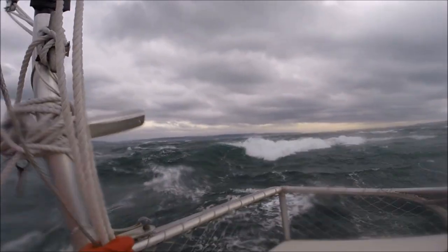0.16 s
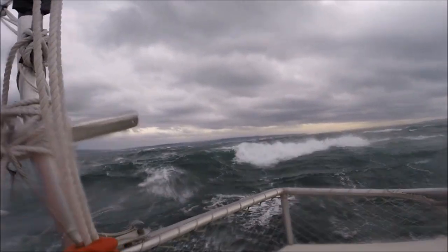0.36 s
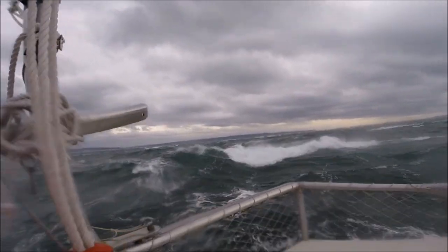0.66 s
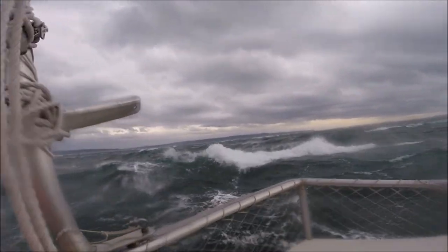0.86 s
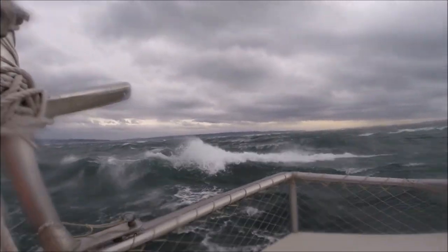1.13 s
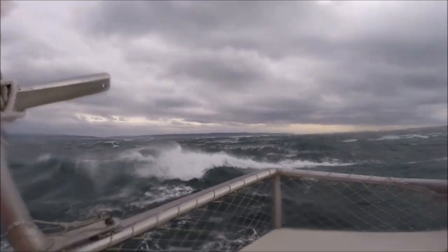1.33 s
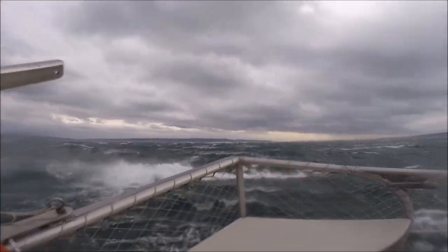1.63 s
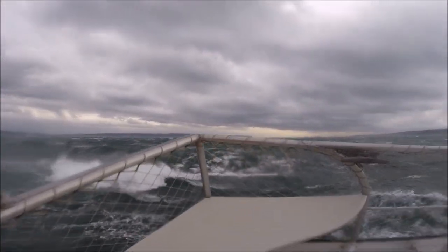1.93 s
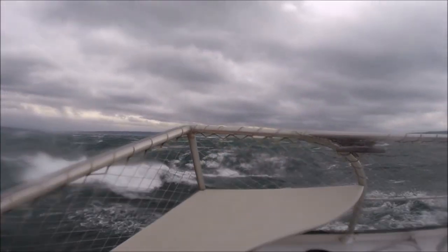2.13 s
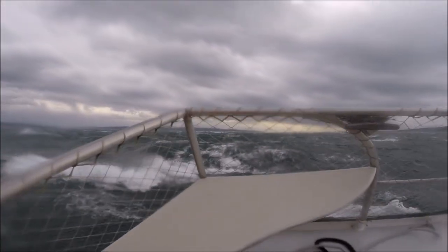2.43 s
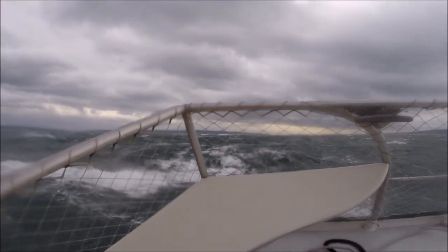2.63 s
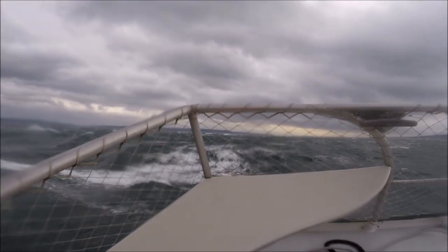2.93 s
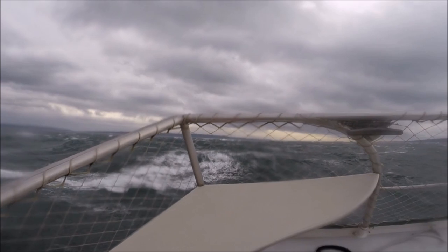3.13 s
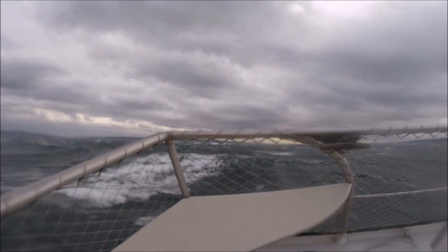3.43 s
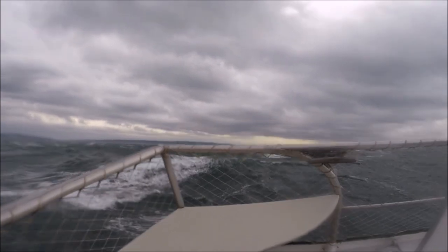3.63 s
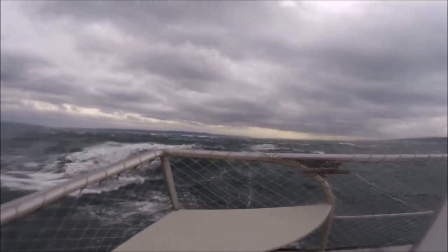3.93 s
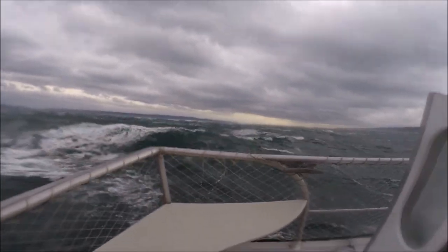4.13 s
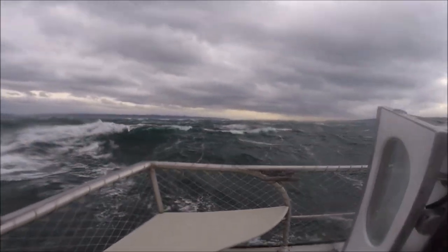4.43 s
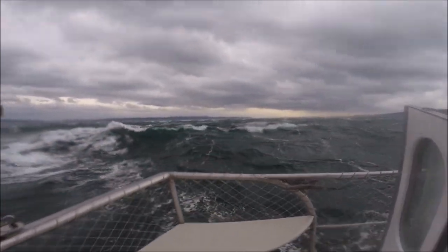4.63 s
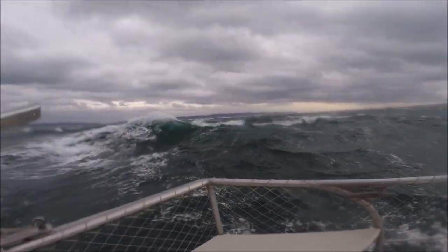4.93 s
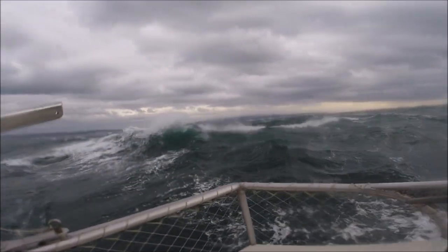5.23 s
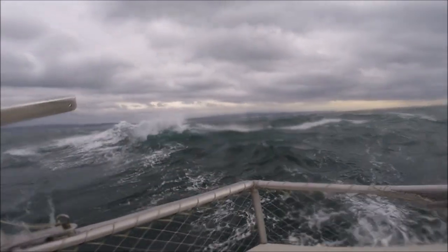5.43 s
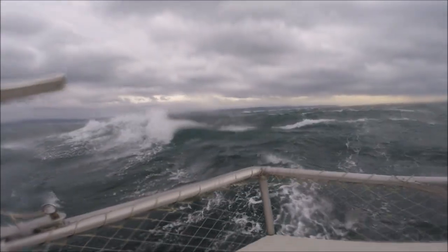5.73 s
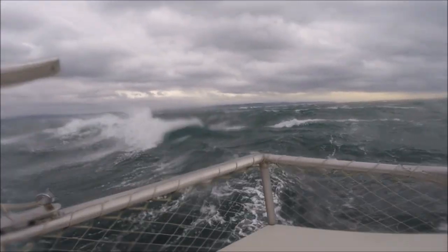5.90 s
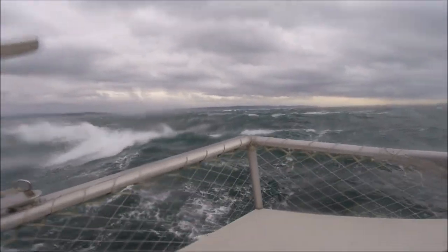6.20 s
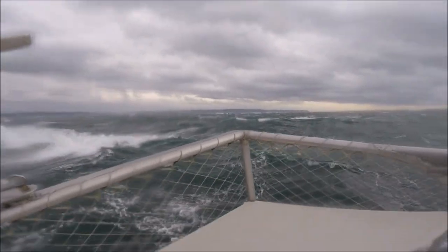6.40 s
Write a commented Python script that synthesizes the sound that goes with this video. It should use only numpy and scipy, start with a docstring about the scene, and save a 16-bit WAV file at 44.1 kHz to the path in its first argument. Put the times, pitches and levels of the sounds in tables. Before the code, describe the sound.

On an open sailboat deck in rough sea, gale wind blasts a small camera's microphone at close range. A high, hissing, whistling rush flutters in rapid buffets over low thuds, with sharp ticks of spray. It is hardest around one to two seconds, falls away past three and a half to reveal the sea's steady wash, then returns in broken puffs and strong gusts.

```python
"""A high, tearing rush of wind comes first: a gale blows over a small camera on a sailboat's deck.
Turbulent air rings the cavities of the housing (rush, howl) and pushes on the microphone (rumble).
Most buffets come and go within hundredths of a second, and spray ticks on the case.
Behind the wind the sea washes steadily, heard best in the lulls, with a faint electronic whine."""
import sys
import numpy as np
from scipy import signal
from scipy.fft import rfft, irfft
from scipy.io import wavfile
from scipy.ndimage import uniform_filter1d, map_coordinates

SR = 44100
rng = np.random.default_rng(int(sys.argv[2]) if len(sys.argv) > 2 else 0)


def unload_audio(sound):
    """Save the sound as a 16-bit wav file, at the path given as the first command line argument."""
    columns = np.transpose(np.atleast_2d(sound))
    # keep every value between -1 and 1, then stretch to whole-number steps
    steps = np.round(np.clip(columns, -1, 1) * 32767)
    wavfile.write(sys.argv[1], SR, steps.astype(np.int16))


N = 289296
T = np.arange(N) / SR  # time in s
GALE_DB = -20.5  # reference wind level of a full gale, dB

# steady blow between buffets: t/s, level/dB
WIND = [(0.0, -28.5), (0.36, -25.5), (0.66, -25.5), (1.0, -20), (1.92, -17.5), (2.52, -27.5), (3.1, -27.5),
        (3.43, -45.5), (3.69, -52), (3.78, -44), (4.18, -45), (4.33, -33.5), (4.86, -31.5), (5.11, -43),
        (5.33, -39.5), (5.57, -28), (6.27, -24.5), (6.56, -28.5)]
# sudden buffets on top of the blow: t/s, length/s, level/dB
BUFFETS = [(0.121, .012, -20), (.154, 0.043, -21.5), (0.234, .03, -22), (0.335, 0.033, -26),
           (0.437, 0.025, -23), (0.544, 0.034, -22), (0.647, 0.033, -18.5), (0.683, 0.022, -16),
           (0.832, .048, -17.5), (0.928, 0.025, -21.5), (1.194, 0.048, -22), (1.354, .18, -25),
           (1.621, .05, -18.5), (2.031, 0.013, -19), (2.227, 0.056, -25.5), (2.506, 0.014, -23.5),
           (2.54, 0.061, -26), (2.67, 0.0063, -23), (2.714, 0.029, -25.5), (2.781, 0.041, -25.5),
           (2.982, 0.018, -24), (3.051, 0.0078, -23.5), (3.088, 0.024, -27), (3.155, 0.096, -24),
           (3.321, 0.012, -26.5), (3.423, .0075, -33.5), (3.632, 0.041, -36.5), (3.706, 0.0084, -28),
           (3.729, 0.036, -30), (3.799, .013, -36), (3.846, 0.019, -25.5), (3.888, 0.097, -37),
           (4.123, 0.025, -27), (4.173, .055, -35), (4.262, 0.016, -30), (4.313, 0.032, -28.5),
           (4.378, .05, -23.5), (4.439, 0.082, -23.5), (4.602, 0.026, -28.5), (4.663, .01, -29),
           (4.713, 0.12, -27), (4.89, 0.053, -25.5), (5.025, 0.024, -30.5), (5.303, 0.0055, -29),
           (5.333, 0.0061, -32), (5.368, .1, -26.5), (5.38, 0.049, -20.5), (5.719, .052, -26),
           (5.791, .02, -20.5), (5.846, 0.054, -24), (5.97, 0.039, -28), (6.134, 0.037, -28),
           (6.237, 0.035, -22), (6.325, 0.054, -26), (6.374, 0.056, -20.5)]
# brief lulls in which the flow leaves the housing: middle t/s, half length/s, depth/dB
LULLS = [(0.114, 0.034, 9.5), (0.428, 0.012, 5.5), (.635, .015, 3), (0.822, 0.013, 5), (1.29, .05, 2),
         (2.297, 0.053, 2.5), (2.49, 0.018, 12), (2.685, 0.032, 19), (2.965, 0.018, 5.5), (3.063, .02, 7.5),
         (3.79, .03, 2), (4.065, 0.034, 11), (4.3, 0.025, 18), (4.624, 0.061, 11.5), (4.702, .012, 2.5),
         (5.018, 0.0085, 9), (5.253, 0.065, 5), (5.67, 0.025, 3.5), (6.042, 0.018, 7)]


def wind_level(rise_s=0.0032, fall_s=0.0065, linger=0.11):
    """Power addition: the steady blow sinks in the lulls, and the power of the buffets adds to it (dB)."""
    blow_db = curves(WIND)[0]
    for middle, half_length, depth_db in LULLS:
        blow_db = blow_db - depth_db * swell(middle, half_length)
    buffet_power = 0
    for start, length, db in BUFFETS:
        # a longer buffet dies more slowly: a share of its length is added to the fall
        envelope = burst(start, length, rise_s, fall_s + linger * length)
        buffet_power = buffet_power + (undb(db) * envelope) ** 2
    return 10 * np.log10(undb(blow_db) ** 2 + buffet_power)


def turbulence(wind_db, slack=0.071):
    """Intermittency: a full gale is evenly turbulent, a slack flow comes in separate puffs (swings in dB)."""
    patchy = np.clip(0.5 + slack * (GALE_DB - wind_db), 0.7, 1.5)
    return patchy * (0.63 * walk(45) + 1.32 * walk(170) + 1.56 * walk(600))


# air resonances of the housing: f/Hz, width/Hz, relative level/dB
CAVITIES = [(1684, 460, -9), (2226, 640, -6.5), (2400, 210, -2.5), (2740, 646, -3), (3474, 610, -14),
            (4240, 600, -17.5), (5624, 700, -17), (6070, 503, -13), (7150, 690, -31.5)]
# gain of the upper cavity ringing: t/s, level/dB
BRIGHTNESS = [(0, -1), (.9, -0.5), (1.7, -3), (2.3, -0.5), (3.2, -3), (5.0, -2.5), (5.4, 3.5), (5.8, -1.5),
              (6.15, 7), (6.56, -3.5)]
# spectrum of the sizzle on the edges: f/Hz, relative level/dB
SIZZLE = [(5000, -3), (7500, 9), (8300, -3), (9500, 0), (10600, -1.5), (12000, -15), (13300, -19.5),
          (15500, -40)]


def rush(wind_db, swirl_db, trim_db=-1, sizzle_db=-28, sizzle_growth=1.0):
    """Flow-excited resonance: small eddies ring the cavities of the housing and sizzle on its edges."""
    ringing = resonate(noise(swirl_db + 0.2 * walk(200)), CAVITIES)
    # the upper resonances come and go as the angle of the flow changes
    bright_db = curves(BRIGHTNESS)[0] + 1.0 * walk(30) + 2.0 * walk(250)
    highpass = signal.butter(2, 3600, "high", fs=SR, output="sos")
    upper = signal.sosfiltfilt(highpass, ringing)
    ringing = ringing + (undb(bright_db) - 1) * upper
    sizzle = colour(noise(swirl_db + 2.0 * walk(22) + 2.0 * walk(1100)), SIZZLE)
    sizzle_level_db = GALE_DB + sizzle_db + sizzle_growth * (wind_db - GALE_DB)
    return ringing * undb(wind_db + trim_db) + sizzle * undb(sizzle_level_db)


# the main cavity, which sings out in the hardest wind: f/Hz, width/Hz, relative level/dB
HOWL = [(2593, 280, 0)]


def howl(wind_db, swirl_db, level_db=-27, growth=1.08):
    """Sustained excitation: a long hard blow feeds the main cavity, so its pitch stands out of the rush."""
    sustained_db = uniform_filter1d(wind_db, SR // 8)  # wind averaged over 1/8 s
    drive_db = wind_db - GALE_DB + (growth - 1) * (sustained_db - GALE_DB)
    return resonate(noise(swirl_db + 1.0 * walk(25)), HOWL) * undb(level_db + drive_db)


# large eddies that hit the microphone port squarely:
# middle t/s, half length/s, rumble gain/dB, flutter gain/dB
EDDIES = [(0.172, .035, 8, 1), (.71, 0.038, 2.5, 6.5), (0.868, 0.046, 9, 8), (1.377, .03, 5, -0.5),
          (1.91, 0.033, 6, 0), (2.084, 0.05, 0.5, 1.5), (2.21, 0.098, 5.5, 3), (2.441, .035, 8, 4),
          (2.74, 0.037, 8, 2.5), (2.962, 0.14, 3.5, 2), (3.5, 0.012, 7, 4), (4.177, 0.022, 6, 2),
          (4.454, 0.017, 7, 1), (4.82, 0.033, 6, -5.5), (5.406, 0.068, 5, 7.5), (5.84, .07, 7.5, -0.5),
          (6.153, 0.043, 6, 1), (6.34, 0.14, 4, 4.5)]
# spectrum of the pressure on the diaphragm: f/Hz, relative level/dB
RUMBLE = [(8, -25), (20, -1), (45, -1), (80, -0.5), (125, -5.5), (200, -13), (400, -25), (900, -63)]
# spectrum of the flapping at the port: f/Hz, relative level/dB
FLUTTER = [(40, 0.5), (90, -5), (170, 0.5), (300, -3), (450, -7.5), (700, -13.5), (950, -13), (1250, -15.5),
           (2000, -7), (4000, -48)]


def rumble(wind_db, swirl_db, rumble_db=-30.0, flutter_db=-31.0, push=0.29, flap=0.66,
           wander_db=1.37, inertia_s=0.041, swirl=0.9):
    """Pseudo-sound: eddies press on the diaphragm and flap at the port, more sluggishly than the rush."""
    force_db = uniform_filter1d(wind_db, int(inertia_s * SR)) - GALE_DB
    low_db = rumble_db + push * force_db
    mid_db = flutter_db + flap * force_db
    for middle, half_length, rumble_gain_db, flutter_gain_db in EDDIES:
        eddy = swell(middle, half_length)
        low_db = low_db + rumble_gain_db * eddy
        mid_db = mid_db + flutter_gain_db * eddy
    wander = wander_db * walk(22)  # shared by both parts
    pressure = colour(noise(0), RUMBLE) * undb(low_db + wander)
    flutter = colour(noise(swirl * swirl_db + 1.47 * walk(60)), FLUTTER) * undb(mid_db + wander)
    return pressure + flutter


# large drops of spray on the case: t/s, level before the common drop gain/dB
DROPS = [(0.614, -35), (0.7192, -24), (0.853, -14), (1.063, -31), (1.1877, -33), (1.2252, -19),
         (1.3032, -22), (2.55, -25), (3.2036, -22.5), (4.2714, -32)]
# showers of fine spray: t/s, length/s, level/dB
SHOWERS = [(0.12, .015, -48), (.44, .02, -52), (2.016, .034, -47), (2.096, 0.06, -46), (2.263, .008, -44),
           (2.16, .29, -53.5), (2.668, .01, -48), (2.724, .019, -45), (3.851, .012, -50),
           (4.376, .039, -46.5), (4.445, 0.03, -51), (4.708, 0.076, -53), (4.891, .008, -47),
           (5.03, .02, -56), (5.372, .06, -50), (6.374, 0.046, -46)]
# spectrum of fine spray: f/Hz, relative level/dB
MIST = [(4000, -12), (7000, 4.5), (10000, 1), (11500, -2), (13000, -13), (15500, -24)]
# spectrum of a drop's tick, large or small: f/Hz, relative level/dB
SPLASH = [(2000, -22), (4500, 5), (7500, -13), (9200, 5), (11500, -10), (13500, -13), (15500, -25)]


def spray(decay_s=0.00063, drop_db=1):
    """Impact noise: each large drop gives one bright tick; fine spray arrives as a grainy hiss."""
    strikes = sum(undb(db) * burst(start, 0, 1 / SR, decay_s) for start, db in DROPS)
    showers = sum(undb(db) * burst(start, length, rise_s=0.002, fall_s=0.007)
                  for start, length, db in SHOWERS)
    ticks = colour(noise(0), SPLASH) * strikes
    mist = colour(noise(3.5 * walk(1500)), MIST) * showers
    return ticks * undb(drop_db) + mist


def droplets(wind_db, per_s=18, level_db=-44, scatter_db=4, growth=0.52, decay_s=0.0016):
    """Random arrivals: small drops reach the case by chance and hit harder in a stronger wind."""
    arrives = rng.random(N) < per_s / SR
    size_db = scatter_db * np.clip(rng.standard_normal(N), -2, 2)
    hits = arrives * undb(level_db + size_db + growth * (wind_db - GALE_DB))
    decay_per_sample = np.exp(-1 / (decay_s * SR))
    envelope = signal.lfilter([1], [1, -decay_per_sample], hits)
    return colour(noise(0), SPLASH) * envelope


# spectrum of the sea's wash: f/Hz, relative level/dB
SEA = [(80, 5.5), (250, -4), (500, -7.5), (750, -14), (1250, -13), (1700, -2), (2700, -6), (3800, -16),
       (4900, -14.5), (6100, -12.5), (7000, -16.5), (8200, -27.5), (11000, -27.5), (15500, -40)]


def sea(level_db=-46):
    """Incoherent summation: breaking crests merge into a wash that swells slowly and fizzes with foam."""
    slow_swell_db = 1.0 * walk(1.2) + 0.26 * walk(13)
    foam_db = 2.0 * walk(900)
    return colour(noise(slow_swell_db + foam_db), SEA) * undb(level_db)


def whine(centre_hz=11712, waver_hz=7, level_db=-78):
    """Frequency modulation: a faint, slightly unsteady electronic tone of the camera."""
    hz = centre_hz + waver_hz * walk(60)
    return unit(np.sin(2 * np.pi * np.cumsum(hz) / SR)) * undb(level_db)


def undb(db):
    """Level law: decibels to amplitude gain."""
    return 10 ** (np.asarray(db) / 20)


def unit(x):
    """Normalization: scale to rms 1."""
    return x / np.sqrt(np.mean(x ** 2))


def curves(table):
    """Linear interpolation: each column of a table, joined by straight lines in time."""
    times, *columns = np.transpose(table)
    return [np.interp(T, times, column) for column in columns]


def walk(rate):
    """Random modulation: straight lines between random points, rate per second, at rms 1."""
    points = rng.standard_normal(8192)
    return unit(map_coordinates(points, [T * rate], order=1, mode="wrap"))


def noise(swing_db):
    """Amplitude modulation: white noise whose level swings by a curve in dB."""
    return rng.standard_normal(N) * undb(swing_db)


def swell(middle, half_length):
    """Gaussian envelope: a smooth bump of height 1."""
    return np.exp(-((T - middle) / half_length) ** 2)


def burst(start, length, rise_s, fall_s):
    """Transient envelope: breaks in linearly, holds and dies away exponentially."""
    age = T - start
    return np.clip(age / rise_s, 0, 1) * np.exp(-np.clip(age - length, 0, 1) / fall_s)


def colour(x, spectrum):
    """Spectral shaping: filter by (f/Hz, level/dB) points joined on a log-frequency axis, to rms 1."""
    hz, db = np.transpose(spectrum)
    bins = np.arange(N // 2 + 1) * SR / N
    gain = undb(np.interp(np.log(np.maximum(bins, 1)), np.log(hz), db))
    # roll off beyond both ends of the curve
    top_end = 1 / (1 + (bins / hz[-1] / 2) ** 4)
    low_end = bins ** 2 / (bins ** 2 + (hz[0] / 2) ** 2)
    return unit(irfft(rfft(x) * gain * top_end * low_end, N))


def resonate(x, modes):
    """Modal superposition: add the power responses of steep resonances and filter by them, to rms 1."""
    bins = np.maximum(np.arange(N // 2 + 1) * SR / N, 1)
    power = 0
    for hz, width, db in modes:
        detuning = (bins - hz ** 2 / bins) / width
        power = power + undb(db) ** 2 / (1 + detuning ** 2) ** 2
    return unit(irfft(rfft(x) * np.sqrt(power), N))


def scene():
    """Superposition: wind on the camera, with spray, sea and whine behind it."""
    wind_db = wind_level()
    swirl_db = turbulence(wind_db)
    wind = rush(wind_db, swirl_db) + howl(wind_db, swirl_db) + rumble(wind_db, swirl_db)
    return (wind + spray() + droplets(wind_db) + sea() + whine())[None]


def record(dry, ceiling=0.75, top_hz=15000):
    """Saturation and band limiting: the camera rounds the highest peaks and cuts the top."""
    rounded = dry / (1 + (dry / ceiling) ** 8) ** (1 / 8)
    lowpass = signal.ellip(8, 0.2, 70, top_hz, fs=SR, output="sos")
    return signal.sosfilt(lowpass, rounded)


dry = scene()
out = record(dry)
unload_audio(out)
```